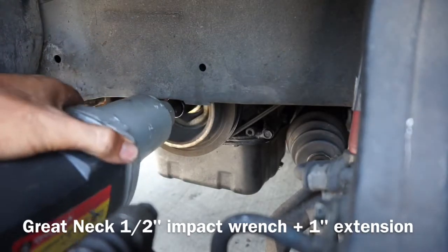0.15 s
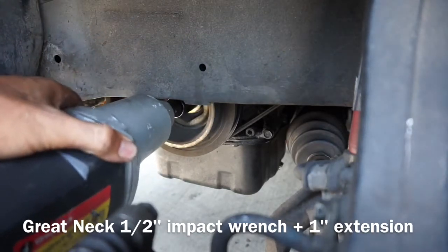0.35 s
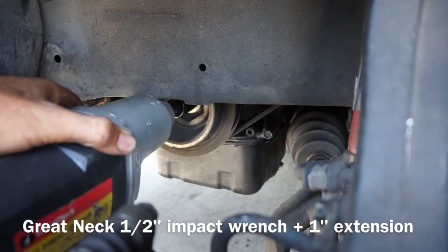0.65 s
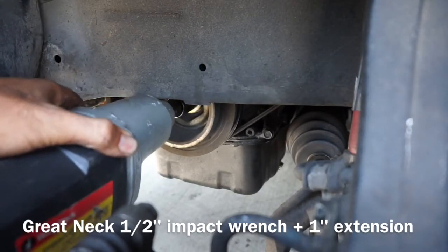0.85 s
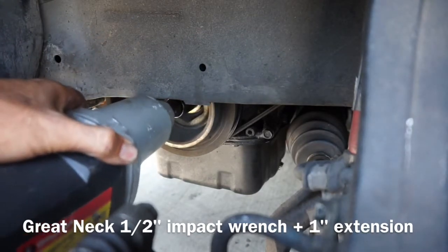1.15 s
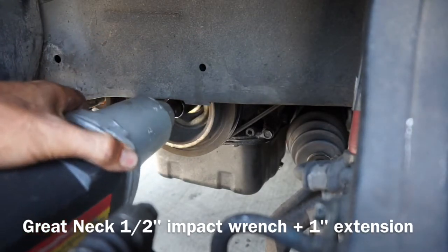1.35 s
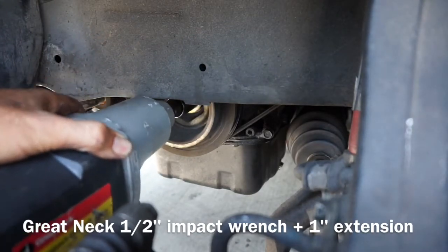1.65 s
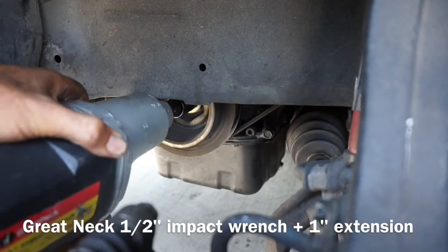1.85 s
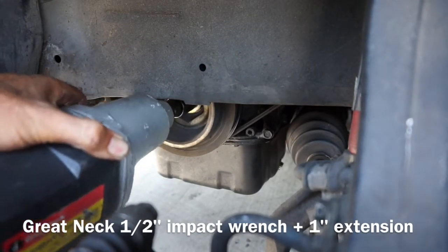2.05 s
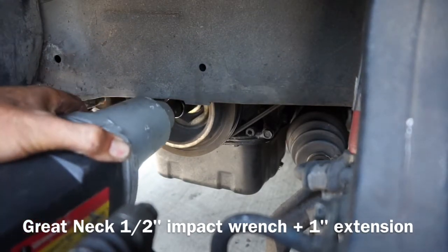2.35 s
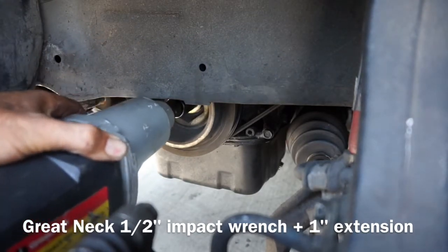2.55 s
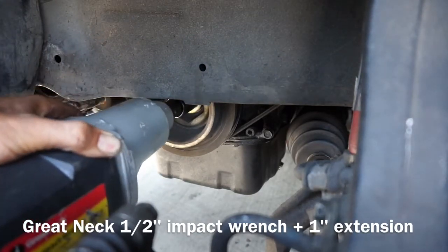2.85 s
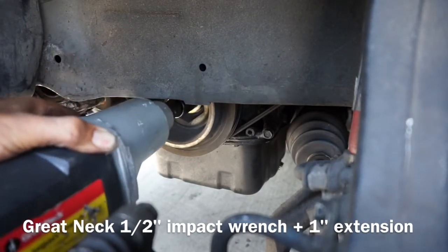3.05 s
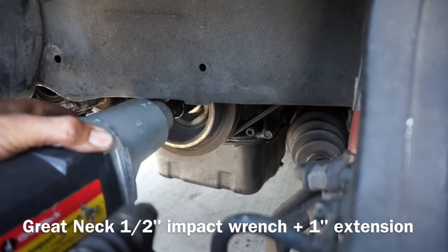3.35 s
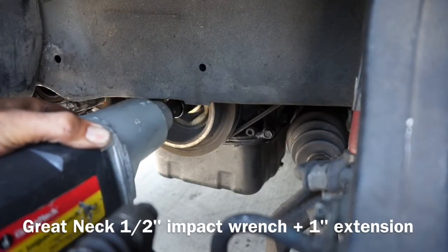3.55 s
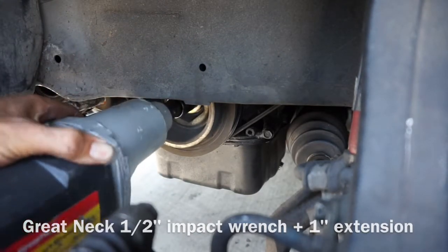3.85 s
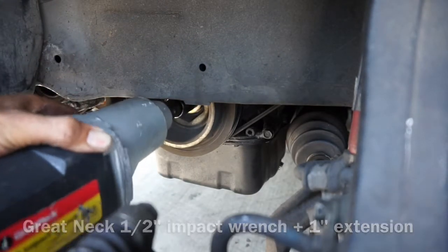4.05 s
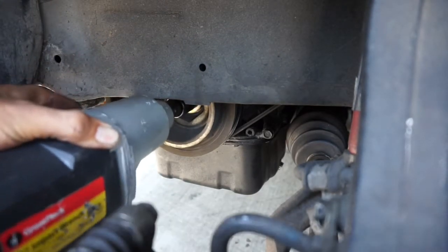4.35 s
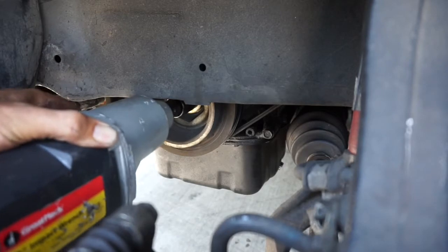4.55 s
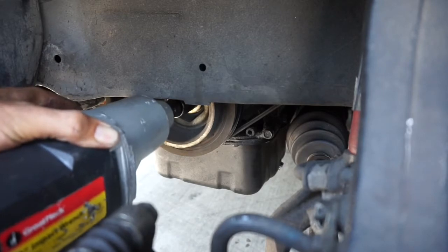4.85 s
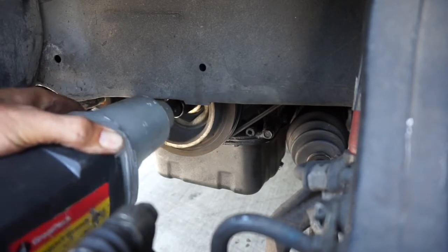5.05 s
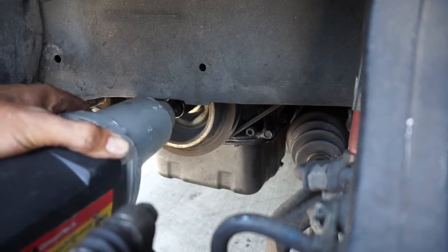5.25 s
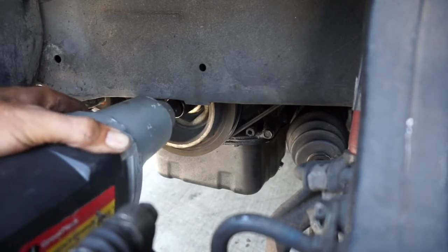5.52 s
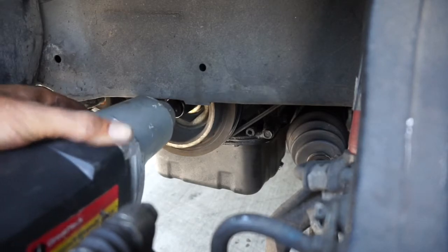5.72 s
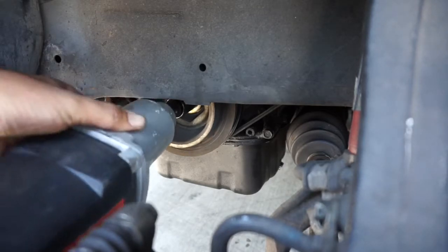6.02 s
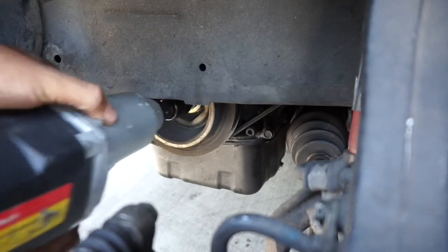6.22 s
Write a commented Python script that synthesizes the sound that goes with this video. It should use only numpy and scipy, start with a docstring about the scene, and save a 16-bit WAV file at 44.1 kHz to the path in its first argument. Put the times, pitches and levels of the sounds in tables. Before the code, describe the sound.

Close in a car's wheel well, an electric impact wrench gives a short growling burst, a ragged second of hammering, then a tiny blip. After a brief pause it growls up again and hammers hard for over three and a half seconds, bright steel cracks over grainy motor whirr. It coasts to an abrupt stop; quiet garage air follows, then one dull panel knock and a tiny click.

```python
"""Impact wrench on a stuck crankshaft bolt

An electric impact wrench works inside a car's wheel well, in a garage. Two squeezes of the trigger, the first
and the last, start with a growl of gears: tooth pulses and scrape ring the gearbox. The hammer strikes in
uneven groups, noise bursts through the steel's resonances, over the motor's grainy whirr and a shaken
engine block. The tool coasts to a stop and knocks once on a panel as it is pulled off."""
import sys
import numpy as np
from scipy import signal
from scipy.fft import rfft, irfft
from scipy.io import wavfile
from scipy.ndimage import uniform_filter1d

SR = 44100
rng = np.random.default_rng(int(sys.argv[2]) if len(sys.argv) > 2 else 0)


def wav_out(sig):
    """Save sig, one row per channel (or a flat mono array), as 16-bit PCM at SR to the path in sys.argv[1]."""
    wavfile.write(sys.argv[1], SR, np.round(np.clip(np.atleast_2d(sig).T, -1, 1) * 32767).astype(np.int16))


N = 281337
TIME = np.arange(N) / SR
TAPS = 4096
HZ = np.fft.rfftfreq(TAPS, 1 / SR)


def amp(db):
    """Decibels to gain."""
    return 10 ** (np.asarray(db) / 20)


def unit(x):
    """Scales to rms 1."""
    return x / np.sqrt(np.mean(x ** 2) + 1e-20)


def read(points, hz):
    """Reads a table on a log-frequency axis."""
    f, value = np.transpose(points)
    return np.interp(np.log(hz + 1), np.log(f + 1), value)


def wander(hz):
    """Slow chance of rms 1, up to about the given rate."""
    lowpass = signal.butter(2, min(hz, SR / 4), fs=SR, output="sos")
    return unit(signal.sosfilt(lowpass, rng.standard_normal(N)))


def white():
    """Two channels of unrelated noise."""
    return rng.standard_normal((2, N))


def causal(db):
    """Minimum-phase response with the given gain at each frequency."""
    cepstrum = irfft(np.log(amp(db)))
    fold = np.r_[1, np.full(TAPS // 2 - 1, 2), 1, np.zeros(TAPS // 2 - 1)]
    return np.exp(rfft(cepstrum * fold))


def resonances(modes):
    """Complex response of a set of (Hz, width Hz, dB) modes."""
    return sum(amp(db) / (1 + 1j * (HZ ** 2 - f ** 2) / (width * HZ + 1e-9)) for f, width, db in modes)


def lifts(modes):
    """Gain in dB of a set of (Hz, width Hz, lift dB) peaks."""
    return sum(lift / (1 + (2 * (HZ - f) / width) ** 2) for f, width, lift in modes)


# Peaks and dips of socket and hammer case. Each row: frequency in Hz, width in Hz, lift in dB.
STEEL = [(1054, 120, 2.5), (2870, 120, 1), (3337, 190, 5), (3910, 91, 4), (4470, 200, 5.5), (4820, 72, 1.5),
         (5620, 140, -0.5), (6360, 360, 1.5), (7444, 150, 1.5), (7820, 170, 3.5), (8480, 180, 2.5),
         (9450, 300, 1.5), (10600, 300, 2.5)]


def steel(spectrum):
    """A broad spectrum lifted at the steel's modes."""
    return causal(read(spectrum, HZ) + lifts(STEEL))


# Likeness of the two microphone ports. Each row: frequency in Hz, likeness from 0 to 1.
LIKENESS = [(100, .97), (500, .92), (1000, .86), (2000, .73), (4000, .62), (9000, .58)]
# Balance of the ports. Each row: frequency in Hz, left minus right in dB.
LEAN = [(60, 0.5), (97, -0.5), (160, 0), (250, -1), (410, 2), (660, -1.5), (1070, 1), (1720, 5), (2780, 2),
        (4500, 0.5), (7270, 3), (11700, 0.5)]


def radiate(drive, response, lead_s=.00002):
    """Two unrelated drives pass a response of unit power and reach the ports partly alike, left first."""
    same = np.clip(read(LIKENESS, HZ), 0, .999)
    lean = amp(read(LEAN, HZ) / 2)
    response = response / np.sqrt(np.mean(abs(response) ** 2))
    left = response * lean
    right = response / lean * np.exp(-2j * np.pi * HZ * lead_s)
    paths = irfft([left, right * same, right * np.sqrt(1 - same ** 2)])
    lead_in = TAPS // 64  # room for what falls before time zero
    paths = np.roll(paths, lead_in, axis=1)
    heard = signal.oaconvolve(drive[[0, 0, 1]], paths, axes=1)[:, lead_in:][:, :N]
    return np.array([heard[0], heard[1] + heard[2]])


def strikes(s, db, rise_s, ring_s, linger_db, linger_s):
    """Envelope of hits: the parts clash, ring for milliseconds, and linger in the wheel well."""
    hits, t = np.zeros(N), TIME[:SR // 6]
    np.add.at(hits, np.clip(np.round(s * SR).astype(int), 0, N - 1), amp(db) ** 2)
    decay = np.exp(-t / ring_s) + amp(linger_db) ** 2 * np.exp(-t / linger_s)
    power = (1 - np.exp(-(t / rise_s) ** 2)) * decay
    return np.sqrt(abs(signal.oaconvolve(hits, power)[:N]))


def ring_out(s, db, modes, rise_s=0.0011):
    """Kicks at the given times swing a set of dying (Hz, dB, t60 s) modes."""
    kicks, t = np.zeros(N), TIME[:SR // 5]
    np.add.at(kicks, (s * SR).astype(int), amp(db))
    ring = sum(amp(level - 60 * t / t60) * np.sin(2 * np.pi * hz * t) for hz, level, t60 in modes)
    return signal.oaconvolve(kicks, ring * (1 - np.exp(-t / rise_s)))[:N]


# Spectrum of the quiet garage. Each row: frequency in Hz, level in relative dB.
AIR = [(25, -38), (65, -18), (110, -3), (160, -3), (260, 3), (310, -14), (400, -15.5), (900, -22.5),
       (1250, -21.5), (2200, -31), (3500, -38.5), (11000, -42.5), (14000, -58.5)]
# Hum of a distant machine. Each row: mean frequency in Hz, level in relative dB.
HUM = [(102, -79), (134, -74.5), (231, -71.5), (255, -75)]


def ambience():
    """Still air as shaped noise, and the wavering sines of a distant machine."""
    hum = sum(amp(db) * np.sin(2 * np.pi * np.cumsum(f + 7 * wander(14)) / SR) for f, db in HUM)
    return amp(-87.5) * radiate(white(), causal(read(AIR, HZ))) + amp(-15.5) * hum


# Decay of the near reflections. Each row: frequency in Hz, t60 in seconds.
GARAGE = [(100, 0.44), (600, 0.32), (2000, 0.17), (3500, .17), (5000, 0.19), (11000, 0.065)]
FAR_DB, FAR_T60_S = -26, 0.72  # far end of the garage, relative to the near reflections


def garage(x, gap_s=0.0027):
    """Diffuse reflections, each band dying at its own speed, over a faint long tail."""
    hz, t, z = signal.stft(rng.standard_normal((2, SR // 2)), SR, nperseg=256)
    near_fade = amp(-60 * t / read(GARAGE, hz)[:, None])
    far_fade = amp(FAR_DB - 60 * t / FAR_T60_S) / (1 + (hz[:, None] / 2100) ** 3)
    fade = (near_fade + far_fade) * np.clip(t / gap_s, 0, 1)
    tail = signal.istft(z * fade, SR, nperseg=256)[1]
    return signal.fftconvolve(x, tail / np.linalg.norm(tail[0]), axes=1)[:, :N]


def wheel_well(x, spread_s=.007, shake_hz=14, count=60, size=10):
    """Liner, pulley and strut throw back quick echoes, unlike at each port, shifting as the tool shakes."""
    blend = np.array([wander(shake_hz) for _ in range(size)])
    echoes = 0
    for share in blend / np.linalg.norm(blend, axis=0):
        delay_s = np.clip(.0002 + spread_s * rng.random((2, count)) ** 2, 0, .04)
        taps = np.zeros((2, SR // 20))
        np.put_along_axis(taps, (delay_s * SR).astype(int), rng.choice([-1., 1.], delay_s.shape), 1)
        mono = (share * x.mean(0))[None]
        echoes = echoes + signal.oaconvolve(mono, taps / np.sqrt(count), axes=1)[:, :N]
    # small parts reflect little bass
    return signal.sosfilt(signal.butter(1, 1500, "high", fs=SR, output="sos"), echoes)


KNOCK_S = 6.189
# Modes of the body panel. Each row: frequency in Hz, width in Hz, level in relative dB.
PANEL = [(148.4, 31, -17), (264, 58, -7.5), (344.6, 58, -6), (516, 58, -11), (678, 25, -6), (780, 52, 3.5),
         (828, 33, 0), (1060, 25, -8), (1294, 45, -18), (1730, 32, -11), (2050, 48, -16), (2541.4, 55, -10)]
# Spectrum of the case sliding on the panel. Each row: frequency in Hz, level in relative dB.
RUB = [(40, -23), (130, 5.5), (400, 0.5), (1200, -1.5), (1700, -12), (3000, -19), (11000, -41.5)]
# Course of the slide. Each row: time in seconds, level in relative dB.
SLIDE = [(6.14, -110), (6.165, -80.5), (6.185, -76), (6.23, -62), (6.29, -79), (6.35, -75.5), (6.38, -80)]
# Spectrum of the motor's whirr, also in the knock's tick. Each row: frequency in Hz, level in relative dB.
WHIRR = [(40, -55.5), (140, -52.5), (230, -32), (380, -19), (470, -17.5), (600, -2.5), (1000, 0.5),
         (1620, -0.5), (1900, 2.5), (2300, 1.5), (2900, -2.5), (3600, -6.5), (6000, -12), (12000, -54)]
# Spectrum of the steel's bright crack. Each row: frequency in Hz, level in relative dB.
CRACK = [(100, -70), (1200, -32), (2600, 1.5), (3600, -0.5), (5200, 1), (7500, 1.5), (11000, 1.5),
         (13000, -14.5)]


def knock(soft_hz=1700, low_hz=130):
    """One dull blow on a panel with a faint tick, and a light rub as the tool slides along it."""
    envelope = strikes(np.array([KNOCK_S]), np.array([0]),
                       rise_s=0.004, ring_s=0.0032, linger_db=-16, linger_s=0.011)
    blow = white() * envelope
    # a padded case passes little treble, and a small panel radiates little bass
    panel = resonances(PANEL) / (1 + 1j * HZ / soft_hz) ** 3 * (HZ / (HZ - 1j * low_hz)) ** 2
    thud = amp([[-1.5], [1.5]]) * radiate(amp(-33.0) * blow, panel)
    tick = amp(-52.5) * radiate(blow, steel(WHIRR)) + amp(-74) * radiate(blow, steel(CRACK))
    slide = white() * amp(np.interp(TIME, *np.transpose(SLIDE)))
    return thud + tick + radiate(slide, causal(read(RUB, HZ)))


# Socket slips off the bolt. One row: time in seconds, level in dB.
UNSEAT = (6.2425, -86)
# Spectrum of that click. Each row: frequency in Hz, level in relative dB.
CLICK = [(500, -35), (2200, -14), (2800, 0), (4600, 0), (5500, -13), (11000, -10)]


def unseat():
    """One small bright click of the socket slipping off: a short noise burst."""
    s, db = np.transpose([UNSEAT])
    envelope = strikes(s, db, rise_s=0.00048, ring_s=.0018, linger_db=-18, linger_s=.006)
    return radiate(white() * envelope, causal(read(CLICK, HZ)))


GRIP_DB, LET_GO_S = -71.5, 5.42
# Spectrum of the socket grating on the bolt. Each row: frequency in Hz, level in relative dB.
GRATE = [(40, -22.5), (150, -11), (400, -1), (1000, 5), (2200, -9), (3500, -10), (6000, -22.5),
         (11000, -31.5)]


def grip(uneven_db=4.0, release_db_per_s=200):
    """Faint uneven grating of the tool held against the bolt, fading once it lets go."""
    db = GRIP_DB + uneven_db * wander(25) - release_db_per_s * np.maximum(TIME - LET_GO_S, 0)
    return radiate(white() * amp(db), causal(read(GRATE, HZ)))


# Squeezes of the trigger. Each row: on in seconds, off in seconds, whirr in dB, brush fizz in dB at full speed.
SQUEEZES = [(0.043, 0.28, -39, -45), (0.502, 1.366, -34, -36.5), (1.429, 1.468, -30, -31),
            (1.714, 5.374, -33, -33.5)]
WHIRR_COAST_DB_PER_S, FIZZ_COAST_DB_PER_S = 239.5, 561  # fade after a full-speed release
SHORT_COAST = 0.84  # a rotor still gathering speed stops this much sooner again
SPIN_UP_S, SLOW_FIZZ_DB = 0.38, -4  # brush fizz grows as the rotor gathers speed
COAST_S, HALT_S = .114, .009  # the coasting rotor comes to rest abruptly


def running(attack_s=0.00295):
    """Gains of whirr and fizz: each squeeze starts the rotor at once, holds, and lets it coast."""
    whirr = fizz = 0
    for on, off, whirr_db, fizz_db in SQUEEZES:
        slow = np.exp(-np.clip(TIME - on, 0, off - on) / SPIN_UP_S)
        gate = np.clip((TIME - on) / attack_s, 0, 1)
        coast = np.maximum(TIME - off, 0) * (1 + SHORT_COAST * slow)
        turning = .5 - .5 * np.tanh((coast - COAST_S) / HALT_S)
        whirr = whirr + gate * turning * amp(whirr_db - WHIRR_COAST_DB_PER_S * coast)
        fizz = fizz + gate * amp(fizz_db + SLOW_FIZZ_DB * slow - FIZZ_COAST_DB_PER_S * coast)
    return whirr, fizz


# Jolts of the tool in the hand. Each row: time in seconds, level in dB.
JOLTS = [(.002, -60), (.047, -57), (.505, -68.5), (.61, -64.5), (.71, -75.5), (1.13, -69), (1.243, -69),
         (1.43, -71), (1.648, -74.5), (1.69, -73.5), (1.765, -60), (1.925, -63.5), (3.44, -75.5),
         (3.61, -70), (3.68, -80), (3.77, -79), (3.985, -79), (4.21, -75), (4.76, -73), (5.24, -67),
         (5.275, -73)]
# Spectrum of jolts and thumps. Each row: frequency in Hz, level in relative dB.
THUMP = [(20, -19), (45, -8.5), (90, 0.5), (160, -2), (400, -29), (2000, -79.5)]
# Spectrum of the bucking tool. Each row: frequency in Hz, level in relative dB.
BUCK = [(25, -28.5), (70, -16), (150, -2), (220, 0), (400, -20.5), (2000, -70.5)]
THUMPS_PER_S, THUMP_DB = 8, -90  # mean rate and mid level of the soft thumps
BUCK_DB = -39  # relative to the strain of the gears


def thumps(strain, spread_db=5):
    """The tool bucks as the gears strain, jolts now and then, and thumps softly while the trigger is held."""
    held = sum((TIME > on) & (TIME < off) for on, off, _, _ in SQUEEZES)
    s = TIME[rng.random(N) < held * THUMPS_PER_S / SR]
    soft = np.c_[s, THUMP_DB + spread_db * np.clip(rng.standard_normal(len(s)), -2, 2)]
    envelope = strikes(*np.r_[JOLTS, soft].T, rise_s=.004, ring_s=0.012, linger_db=-23, linger_s=.02)
    lumps = radiate(white() * envelope, causal(read(THUMP, HZ)))
    return lumps + radiate(white() * strain * amp(BUCK_DB), causal(read(BUCK, HZ)))


# Jerks of the crank. Each row: time in seconds, block shake in dB, pulley ring in dB.
JERKS = [(.001, -44.5, -60.5), (.045, -55, -39.5), (.1, -48.5, -16.5), (.245, -67, -26), (.51, -54, -35),
         (1.44, -68, -46), (1.715, -54.5, -42.5), (1.806, -31, -20), (1.838, -44, -21.5),
         (1.952, -50.5, -17.5), (1.998, -47.5, -34), (2.04, -61, -23.5), (2.077, -57, -22.5),
         (4.174, -53.5, -21), (4.194, -53.5, -21), (4.253, -65, -22), (4.292, -55, -21)]
# Spectrum of the block's rumble. Each row: frequency in Hz, level in relative dB.
RUMBLE = [(20, -37.5), (60, -29.5), (110, -27.5), (180, -7), (290, 1.5), (390, 7.5), (480, -0.5),
          (700, -25), (2000, -71)]
# Modes of the crank pulley. Each row: frequency in Hz, width in Hz, level in relative dB.
PULLEY = [(660, 76.6, -12), (787, 94, 5), (936, 69, -3.5)]
JERK_RISE_S, JERK_FADE_S = 0.0011, 0.014
SHAKE_DB, PULLEY_DB, PULLEY_FOLLOW = -35.5, -6, 0.7  # shake relative to whirr; pulley gain, exponent on shake


def engine(whirr, lumpy_db=6.0):
    """The shaken engine block rumbles in lumps and the crank pulley rings along."""
    s, shake_db, _ = np.transpose(JERKS)
    jerks = strikes(s, shake_db, rise_s=JERK_RISE_S, ring_s=JERK_FADE_S, linger_db=-10.5, linger_s=0.083)
    shake = np.hypot(amp(SHAKE_DB) * whirr, jerks)
    rumble = radiate(white() * shake * amp(lumpy_db * wander(9)), causal(read(RUMBLE, HZ)))
    colour = causal(read([(200, -31.5), (600, -0.5), (1000, -3.5), (2500, -7.5)], HZ))  # (Hz, dB)
    ring = radiate(white(), resonances(PULLEY) * colour)
    return amp(-2.0) * rumble + amp(PULLEY_DB) * ring * shake ** PULLEY_FOLLOW


# Mode of the block. Each row: frequency in Hz, level in dB relative to the shake, t60 in seconds.
BLOCK_RING = [(389, -2.5, .16)]


def pulley():
    """Each jerk swings one mode of the pulley and one of the block, which die quickly."""
    s, shake_db, ring_db = np.transpose(JERKS)
    return ring_out(s, ring_db, [(842.0, 0.0017, 0.042)]) + ring_out(s, shake_db, BLOCK_RING)


# Heavy blows that set a steel part singing. Each row: time in seconds, level in dB.
SINGING = [(.11, -77), (1.325, -63.5)]
# Its long modes. Each row: frequency in Hz, level in relative dB, t60 in seconds.
SINGING_MODES = [(389, -1, 4.5), (616, -1.5, 1.6), (704, 2, 1.4), (810, -3, 1.2), (967, 4, .6)]


def singing_part():
    """Low modes of a steel part that outlast the pauses."""
    ring = 0
    for s, db in SINGING:
        t = np.maximum(TIME - s, 0)
        for hz, level, t60 in SINGING_MODES:
            ring = ring + amp(db + level - 60 * t / t60) * np.sin(2 * np.pi * hz * t)
    return ring


# Starts of the rotor with a growl, in the first and the last squeeze.
# Each row: start in seconds, hardest strain in seconds, breaks free in seconds, end in seconds, level in dB.
STARTS = [(0.043, 0.126, .138, 0.18, -17.5), (1.713, 1.785, 1.806, 1.84, -17.5)]
TOOTH_HZ, TOOTH_CLIMB_HZ_PER_S = 780, 2400  # slow climb of the tooth rate
FREE_JUMP_HZ, FREE_S, FREE_DROP_DB = 1191, 0.0058, -1.5  # the rate leaps and the growl drops on breaking free
STRAIN_DB_PER_S, GEAR_RELEASE_DB_PER_S = 160.5, 1298.5  # swell and ebb around the hardest strain; end fade
# under strain, each half wave of the mains knocks the gears together
MAINS_PULSE_HZ, MAINS_CREST_S, MAINS_RIPPLE_DB = 120, .0592, 2.5


def spin_up():
    """Gain and tooth rate of the gears: they strain against the hammer spring, then break free."""
    gain, tooth_hz = np.zeros(N), np.full(N, float(TOOTH_HZ))
    for start, hardest, free, end, db in STARTS:
        on, t = TIME >= start, np.clip(TIME - start, 0, end - start)
        leap = .5 + .5 * np.tanh((TIME - free) / (2 * FREE_S))
        ebb_db = STRAIN_DB_PER_S * abs(TIME - hardest) + GEAR_RELEASE_DB_PER_S * np.maximum(TIME - end, 0)
        gain = gain + on * amp(db - ebb_db + FREE_DROP_DB * leap)
        climb_hz = TOOTH_HZ + TOOTH_CLIMB_HZ_PER_S * t + FREE_JUMP_HZ * leap
        tooth_hz = np.where(on, climb_hz, tooth_hz)
    ripple_db = MAINS_RIPPLE_DB * np.cos(2 * np.pi * MAINS_PULSE_HZ * (TIME - MAINS_CREST_S))
    return gain * amp(ripple_db), tooth_hz


# Modes of the gearbox. Each row: frequency in Hz, width in Hz, level in relative dB.
GEARBOX = [(660, 410, -7.5), (987, 56, -0.5), (1340, 550, -5.5), (1774, 110, 4), (1940, 80, 1),
           (2380, 190, -1.5), (2860, 150, -4.5), (3270, 120, -6.5), (4160, 150, -15.5), (4880, 170, -4.5)]
# How well the small housing radiates. Each row: frequency in Hz, gain in relative dB.
HOUSING = [(50, -14.5), (250, -5), (470, -13), (600, 7), (4000, -5.5), (11000, -5)]


def gears(strain, tooth_hz, rough=0.68, jitter=.07):
    """Gear teeth mesh ever faster and scrape; their pulses sweep through the gearbox's resonances."""
    turns = np.cumsum(tooth_hz * (1 + jitter * wander(249.3))) / SR
    teeth = unit(sum(np.cos(2 * np.pi * k * turns) for k in range(1, 5)))
    scrape = white() * unit(amp(2.3 * wander(300)))
    mesh = amp(-12.5) * np.sqrt(1 - rough) * teeth + np.sqrt(rough) * scrape
    # tooth pulses and scrape both ring the gearbox and leave through its housing
    return radiate(mesh * strain, resonances(GEARBOX) * causal(read(HOUSING, HZ))) * amp(-3.0)


# Gear slack slams shut as the rotor starts. Each row: time in seconds, level in dB.
SLACK = [(0.041, -20), (0.0478, -18.5), (0.0568, -12), (0.0656, -14), (.0987, -19.5), (0.117, -19.5),
         (1.7136, -29), (1.757, -11.5), (1.7997, -19)]
# Ring of the housing. Each row: frequency in Hz, level in relative dB, t60 in seconds.
HOUSING_RING = [(1740, 2, 0.017), (2366, -2, 0.027), (3200, -14, 0.029)]


def gear_slack():
    """Each slam of the slack gears swings the housing's modes."""
    return ring_out(*np.transpose(SLACK), HOUSING_RING, rise_s=.001)


def motor(whirr, fizz, ticks_per_s=260, tick_share=.55):
    """Whirr and brush fizz, broken up by the small ticks of cam and gear teeth."""
    s = np.flatnonzero(rng.random(N) < ticks_per_s / SR) / SR
    tick_db = 3 * np.clip(rng.standard_normal(len(s)), -2, 2)
    ticks = unit(strikes(s, tick_db, rise_s=0.00026, ring_s=0.00085, linger_db=-9, linger_s=0.0038))
    grain = np.sqrt(1 - tick_share + tick_share * ticks ** 2)
    whirring = radiate(white() * grain * whirr, steel(WHIRR))
    fizzing = radiate(white() * grain * fizz, steel(CRACK))
    return amp(-4.0) * whirring + amp(-9.5) * fizzing


# Light taps and rattles in the pauses, as the tool stops, and just before the panel knock.
# Each row: time in seconds, level in dB.
RATTLES = [(0.292, -31.5), (0.299, -32.5), (0.357, -49), (.370, -58), (.406, -61), (0.49, -56.5),
           (1.558, -67.5), (1.582, -49), (1.604, -48), (1.621, -41.5), (1.653, -55), (1.702, -56.5),
           (5.457, -59), (5.467, -60), (5.481, -60), (5.515, -60.5), (6.16, -86)]
# Spectrum of the steel's clank. Each row: frequency in Hz, level in relative dB.
CLANK = [(40, -49), (140, -51.5), (230, -27.5), (380, -18.5), (470, -24.5), (580, 0), (850, -4), (1100, 3),
         (1620, -0.5), (1850, 2.5), (2300, 5.5), (2900, -3.5), (3800, -10.5), (6000, -33), (12000, -52.5)]


def socket():
    """Light taps and rattles of the socket, each with a small ping."""
    s, db = np.transpose(RATTLES)
    taps = white() * strikes(s, db, rise_s=0.00062, ring_s=0.002, linger_db=-13, linger_s=0.0099)
    ping = ring_out(s, db, [(3345, -12.5, .04)])
    return amp(-4.5) * radiate(taps, steel(CLANK)) + amp(-17.0) * radiate(taps, steel(CRACK)) + ping


# Modes of socket and extension. Each row: frequency in Hz, level in dB relative to the clank, t60 in seconds.
SOCKET_RING = [(1090, -12, 0.039), (1813, -14.5, 0.068), (1970, -11, 0.08), (2060, -14.5, 0.045),
               (2188, -13, 0.05), (3350, -16.5, 0.061), (4420, -17.5, 0.031), (6375, -17, .022),
               (7490, -15, .022), (9400, -16, .02)]
RESEAT_S, LOOSE_PITCH = 1.6, .925  # pressed home for the long burst; pitch factor until then


def socket_ring(blows):
    """Socket and extension ring on from blow to blow, nearer the left port, and lower while loosely seated."""
    s, _, clank_db = np.transpose(blows)
    loose_modes = [(hz * LOOSE_PITCH, db, t60) for hz, db, t60 in SOCKET_RING]
    seats = (s < RESEAT_S, loose_modes), (s >= RESEAT_S, SOCKET_RING)
    ring = sum(ring_out(s[now], clank_db[now], modes, rise_s=0.003) for now, modes in seats)
    return amp([[.3], [-4.7]]) * ring


# Socket resonances while loose, pressed home, then deeper on the bolt.
# Each row: frequency in Hz, width in Hz, lift in dB.
LOOSE = [(700, 180, 2.5), (1380, 100, 0.5), (1770, 320, 6), (2450, 400, 0)]
HOME = [(1620, 140, -3.5), (1770, 60, 7.5), (1955, 87, 7.5), (2130, 170, 3.5), (2400, 121, 1.5)]
DEEP = [(1620, 160, -3), (1812, 69.52, 7.5), (1957, 70, 4.5), (2090, 90, 5.5), (2205, 112, 6.5),
        (2480, 150, .5)]
DEEPEN_S, SEATING_S = 3.5, 0.17  # time of the deeper seat; length of a change of seat


def seated(x):
    """The tool's sound passes through the socket, whose resonances depend on how it sits on the bolt."""
    pressed, deep = (np.clip(.5 + (TIME - s) / SEATING_S, 0, 1) for s in (RESEAT_S, DEEPEN_S))
    out = 0
    for share, modes in ((1 - pressed, LOOSE), (pressed - deep, HOME), (deep, DEEP)):
        out = out + signal.oaconvolve(x * share, irfft(causal(lifts(modes)))[None], axes=1)[:, :N]
    return out


# Runs of regular blows; when the hammer limps, every second blow comes early and lands heavier.
# Each row: first beat in seconds, last beat in seconds, count of blows, limp in seconds, crack in dB,
# clank in dB, rebound in dB relative to the blow.
RUNS = [(0.809, 0.9225, 4, 0.00055, -22, -25, -0.5), (0.958, 0.993, 2, 0.00048, -21.5, -24.5, 2),
        (2.3465, 2.5028, 6, 0.012, -21.5, -22, -1.5), (2.524, 2.55, 2, 0.00073, -24, -25, 3.5),
        (2.583, 2.8218, 9, 0, -21.5, -22.5, 0.5), (2.85, 2.882, 2, 0, -21.5, -23, -2),
        (2.9202, 3.3059, 14, 0.012, -22.5, -23, 1.5), (3.337, 4.023, 24, 0.0092, -22, -24.5, 0),
        (4.045, 4.072, 2, 0.0018, -24.5, -24, 5), (4.114, 4.262, 6, 0.013, -22.5, -23, 1),
        (4.284, 4.338, 3, 0.0017, -22.5, -25, 1), (4.3795, 4.525, 6, 0.01, -21.5, -22.5, 1),
        (4.584, 4.794, 8, .011, -21, -22.5, 0), (4.851, 4.884, 2, 0.013, -22, -23, 0.5),
        (4.902, 4.93, 2, 0.0019, -22.5, -25, 1.5), (4.971, 5.001, 2, 0.011, -23, -28.5, 0),
        (5.02, 5.108, 4, 0.0017, -24, -27, 4.5)]
# Single blows outside the regular runs, with weak ticks between blows and a click as the tool stops.
# Each row: time in seconds, bright crack in dB, body clank in dB.
SINGLES = [(0.0247, -47, -38), (0.042, -26.5, -15.5), (0.0694, -24, -15.5), (0.165, -20, -20.5),
           (0.2348, -20, -20), (0.239, -35, -29), (0.5099, -31, -20), (0.52, -23.5, -42),
           (0.5487, -33, -43), (0.627, -20, -20), (0.687, -25, -25.5), (0.7028, -25.5, -25.5),
           (0.7362, -21, -23), (0.753, -22, -21), (0.779, -22, -20.5), (.8, -26.5, -28.5),
           (0.832, -23.5, -23), (0.87, -28, -28), (0.906, -28, -33), (1.027, -26.5, -23),
           (1.037, -26.5, -23.5), (1.045, -28.5, -24), (1.06, -19, -22.5), (1.067, -24.5, -21.5),
           (1.084, -25.5, -24.5), (1.095, -24.5, -26.5), (1.101, -21.5, -27.5), (1.139, -21, -29),
           (1.1612, -22.5, -21), (1.171, -21, -26.5), (1.214, -21, -20.5), (1.229, -24.5, -22.5),
           (1.24, -29.5, -27.5), (1.263, -20, -19.5), (1.276, -23, -22), (1.3264, -18, -20),
           (1.339, -39, -34.5), (1.431, -34.5, -26), (1.4391, -20, -15.5), (1.4658, -23, -21.5),
           (1.737, -28.5, -23.5), (1.84, -19, -21.5), (1.9023, -22.5, -26.5), (1.951, -22.5, -27.5),
           (1.984, -26, -25.5), (1.9962, -24.5, -24.5), (2.039, -22, -24.5), (2.064, -20.5, -22),
           (2.075, -22, -28.5), (2.086, -24, -28), (2.102, -25, -19), (2.112, -21, -26.5),
           (2.148, -21, -23), (2.163, -29, -30.5), (2.171, -22.5, -27), (2.18, -22, -24),
           (2.206, -24.5, -23), (2.215, -21.5, -25.5), (2.2499, -24, -23.5), (2.271, -23.5, -22.5),
           (2.278, -20, -21), (2.305, -20.5, -26), (2.461, -29.5, -24), (2.97, -30.5, -27.5),
           (4.5462, -25, -29), (4.555, -22.5, -23.5), (4.634, -34.5, -31.5), (4.695, -35.5, -33),
           (4.8116, -20.5, -29), (4.821, -24, -31), (5.1478, -24, -23.5), (5.156, -22, -28),
           (5.1768, -24.5, -22), (5.1862, -21.5, -22), (5.232, -19, -24), (5.245, -23, -25.5),
           (5.255, -30, -32), (5.272, -34, -24.5), (5.2825, -21.5, -18), (5.298, -45, -28),
           (5.352, -18, -19), (5.411, -47, -44)]
# per second of limp the late blow loses clank and rebound, and cracks a little brighter
LIGHT_DB_PER_S, LOST_REBOUND_DB_PER_S, CRISP_DB_PER_S = 600.5, 2002.5, 129
REBOUND_S, REBOUND_SHORTENING = .0083, 0.2043  # the hammer bounces and lands again, sooner when it limps
CAM_S, CAM_DB = .0145, -18  # after each blow of a run the hammer ticks over the anvil's lugs
SCATTER_S, SCATTER_DB = .0003, 0.87  # chance from blow to blow


def hammer_blows():
    """All hits as rows of (s, crack dB, clank dB): the runs with their rebounds and ticks, and the singles."""
    rows = [np.array(SINGLES)]
    for first, last, count, limp, crack, clank, rebound in RUNS:
        s = np.linspace(first, last, round(count))
        early = np.arange(len(s)) % 2
        late = limp * (1 - early)
        blow = np.c_[s - limp * early, crack + CRISP_DB_PER_S * late, clank - LIGHT_DB_PER_S * late]
        bounce_db = rebound - LOST_REBOUND_DB_PER_S * late
        bounce_s = np.full(len(s), REBOUND_S - REBOUND_SHORTENING * limp)
        bounce = blow + np.c_[bounce_s, bounce_db, bounce_db]
        tick = blow + [CAM_S, CAM_DB, CAM_DB]
        hits = np.r_[blow, bounce, tick]
        rows.append(hits + rng.standard_normal(hits.shape) * [SCATTER_S, SCATTER_DB, SCATTER_DB])
    return np.concatenate(rows)


def hammer(blows, drag_s=.0026, colour_db=1.36, split_hz=6500):
    """The hammer drags on its cam, then chatters through anvil and socket: a bright crack, a longer clank."""
    s, crack_db, clank_db = np.transpose(blows)
    chatter = unit(amp(1.2 * wander(2500)))
    drag = strikes(s - drag_s, crack_db - 17.0, rise_s=0.0017, ring_s=0.0016, linger_db=-26.5, linger_s=.005)
    clank = strikes(s, clank_db, rise_s=0.0014, ring_s=0.0022, linger_db=-9.5, linger_s=0.0044)
    out = amp(-2.5) * radiate(white() * chatter * np.hypot(clank, drag), steel(CLANK))
    # a square hit is brighter, a glancing one duller
    squareness_db = colour_db * np.clip(rng.standard_normal(len(s)), -2, 2)
    upper = 1 / (1 + (split_hz / (HZ + 1)) ** 6)
    for tilt, share in ((0.82, upper), (-0.093, 1 - upper)):
        crack = strikes(s, crack_db + tilt * squareness_db,
                        rise_s=0.0012, ring_s=0.0015, linger_db=-11.5, linger_s=0.0078)
        burst = white() * chatter * np.hypot(crack, drag)
        out = out + amp(0.23) * radiate(burst, steel(CRACK) * np.sqrt(share))
    return out


LABOUR_DB = -9  # the motor labours louder with the strain of the gears


def scene():
    """The wrench close by in the wheel well, the garage around it."""
    blows = hammer_blows()
    whirr, fizz = running()
    strain, tooth_hz = spin_up()
    labouring = np.hypot(whirr, amp(LABOUR_DB) * strain)
    wrench = seated(hammer(blows) + socket() + motor(labouring, fizz))
    wrench = wrench + socket_ring(blows) + gears(strain, tooth_hz) + gear_slack()
    car = engine(whirr) + pulley() + singing_part() + amp(-14.5) * knock()
    near = wrench + car + unseat() + thumps(strain) + grip()
    near = near + amp(-4.5) * wheel_well(near)
    return near + amp(-19.0) * garage(near) + ambience()


EDGE_HZ = 11170  # band limit


def record(dry, boost_db=16, threshold_db=-57, recovery_db_per_s=48):
    """Gain control lifts quiet passages and backs off under loud ones; then the band limit."""
    power_db = 10 * np.log10(abs(uniform_filter1d((dry ** 2).mean(0), size=200)) + 1e-12)
    fall_db = TIME * recovery_db_per_s
    over_db = np.clip(power_db - threshold_db, 0, boost_db)
    duck_db = np.maximum.accumulate(over_db + fall_db) - fall_db  # ducks at once, recovers steadily
    out = dry * amp(boost_db - uniform_filter1d(duck_db, size=300))
    lowpass = signal.firwin(181, EDGE_HZ, window=("kaiser", 7), fs=SR)
    return signal.oaconvolve(out, lowpass[None], "same")


dry = scene()
out = record(dry)
wav_out(out)
```